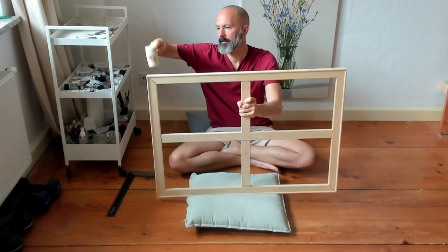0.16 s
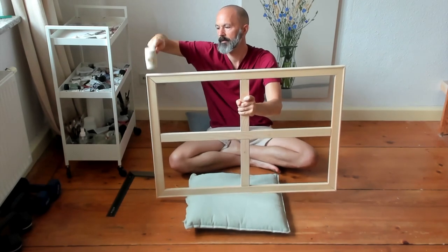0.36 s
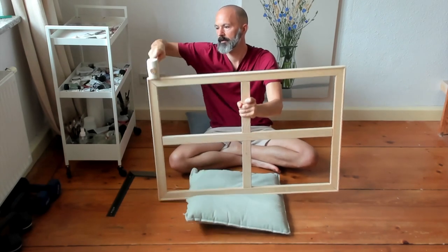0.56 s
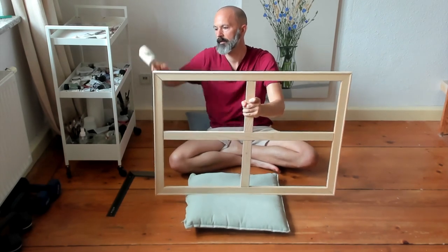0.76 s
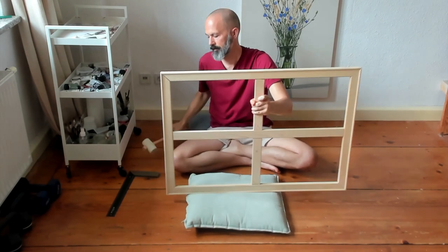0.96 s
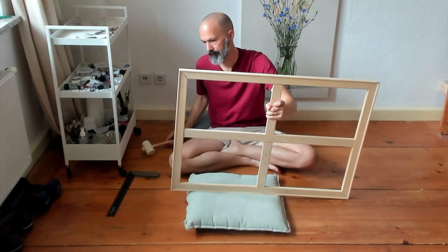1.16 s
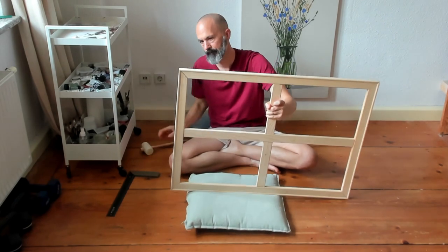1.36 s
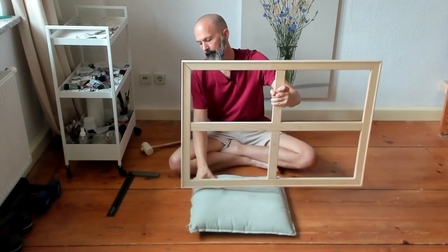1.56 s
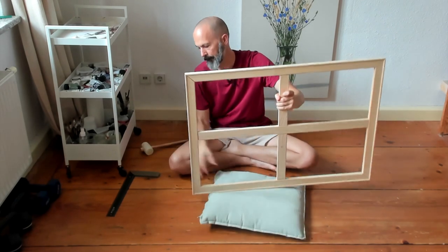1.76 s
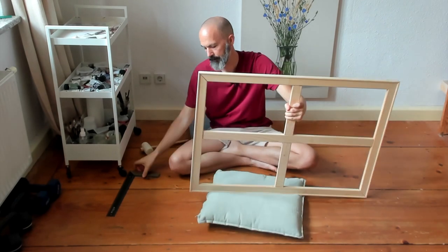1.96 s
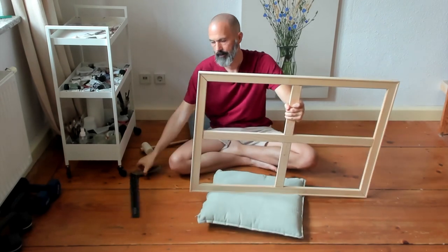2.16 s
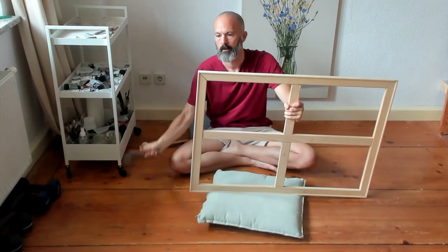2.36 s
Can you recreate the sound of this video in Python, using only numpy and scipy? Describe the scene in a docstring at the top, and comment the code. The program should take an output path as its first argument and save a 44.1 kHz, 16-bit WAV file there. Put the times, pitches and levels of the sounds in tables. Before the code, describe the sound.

Mallet knocks on a hand-held wooden frame: three bright, hollow, short taps at about 0.1, 0.3 and 0.55 s. Cloth rustles near 0.9 s. The mallet clatters onto floorboards at 1.1-1.3 s. Soft rustling and low shifting follow, the frame bumps the floor at 1.9 s, then a steel square scrapes the boards at 2.0-2.3 s and rings faintly. Small room, short reverberation, very quiet background.

```python
"""Mallet and wooden frame

A mallet taps the corner of a hand-held wooden stretcher frame three times in a small room with floorboards.
The mallet is laid on the boards, head then clattering handle, and the frame bumps the floor: decaying modes.
A steel square dragged over the boards is hiss, rub and grit-fed modes, and rings as it lifts.
Clothes, shifting weight and the steady background are shaped noise; the room is a wall echo and a short tail."""
import sys
import numpy as np
from scipy import signal
from scipy.io import wavfile
from scipy.ndimage import uniform_filter1d

SR = 44100
rng = np.random.default_rng(int(sys.argv[2]) if len(sys.argv) > 2 else 0)


def file_out(sig):
    """Save sig as 16-bit WAV at sys.argv[1]."""
    # one column per channel
    cols = np.atleast_2d(sig).T
    # limit, then scale
    lim = np.clip(cols, -1, 1)
    pcm = np.round(lim * 32767).astype(np.int16)
    wavfile.write(sys.argv[1], SR, pcm)


N = 110250
TIME_S = np.arange(N) / SR
RING_TIME_S = TIME_S[:SR * 3 // 4]
BAND_EDGES_HZ = np.geomspace(23, 16800, 20)  # half octaves
BAND_CENTRES_HZ = np.sqrt(BAND_EDGES_HZ[1:] * BAND_EDGES_HZ[:-1])


def amp(db):
    """Decibels to gain."""
    return 10 ** (np.asarray(db) / 20)


def unit(x):
    """Scale to rms 1."""
    return x / np.sqrt(np.mean(x ** 2) + 1e-20)


def at_hz(table, hz):
    """Every column after the first, interpolated on a log-frequency axis."""
    f_hz, *columns = np.transpose(table)
    return [np.interp(np.log(hz), np.log(f_hz), column) for column in columns]


def level(curve):
    """Gain along a (t/s, level/dB) curve, fading quickly outside it."""
    t_s, db = np.transpose(curve)
    outside_s = np.abs(TIME_S - np.clip(TIME_S, t_s.min(), t_s.max()))
    return amp(np.interp(TIME_S, t_s, db)) * np.exp(-outside_s / 0.0063)


def fade(t60_s):
    """Exponential decay, 60 dB per t60."""
    return np.exp(-np.log(1000) * RING_TIME_S / t60_s)


def band(x, low_hz, high_hz):
    """Butterworth band-pass."""
    sos = signal.butter(2, [low_hz, min(high_hz, .45 * SR)], "band", fs=SR, output="sos")
    return signal.sosfilt(sos, x)


def low_cut(x):
    """High-pass: the knocks and the scrape carry little deep bass."""
    return signal.sosfilt(signal.butter(2, 246, "high", fs=SR, output="sos"), x)


def noise_bands(size):
    """Unrelated half-octave noises of rms 1."""
    bands = []
    for low_hz, high_hz in zip(BAND_EDGES_HZ, BAND_EDGES_HZ[1:]):
        white = rng.standard_normal(size + 4000)  # the lead-in lets the filter settle
        bands.append(unit(band(white, low_hz, high_hz)[-size:]))
    return np.array(bands)


def noise(spectrum):
    """Steady noise with the given half-octave levels."""
    return amp(at_hz(spectrum, BAND_CENTRES_HZ)[0]) @ noise_bands(N)


def ring(hz, t60_s):
    """One struck mode: a decaying cosine of height 1."""
    return np.cos(2 * np.pi * hz * RING_TIME_S) * fade(t60_s)


def through(x, response):
    """Convolve a signal with an impulse response."""
    return signal.fftconvolve(x, response)[:N]


def add(out, t_s, sound):
    """Mix a sound in at a time."""
    part = out[int(t_s * SR):][:len(sound)]
    part += sound[:len(part)]


def tick(edges_hz, t60_s):
    """A hard contact: a few milliseconds of bright noise."""
    return unit(band(rng.standard_normal(len(RING_TIME_S)), *edges_hz)) * fade(t60_s)


def knocks(blows, modes, grain):
    """Each blow rings the wood's main modes and the crowd between them, and shakes the floor.

    Contact hardness sets the colour and the rise time."""
    # deep floor modes: f/Hz, level/dB, t60/s
    boom_modes = [(122.3, -2, .5), (128.6, -8.5, .3), (155.6, 0.5, 0.29), (223.1, -7.5, 0.22)]
    boom_rise_s, bass_knee_hz = 0.0049, 544
    # rise constant at 0 dB/octave; doubles per softness_db of lost brightness
    contact_rise_s, softness_db = .00012, 2.5
    crack_hz, crack_t60_s = (10800, 17200), 0.01

    out = np.zeros(N)
    grain_db, grain_t60_s = at_hz(grain, BAND_CENTRES_HZ)
    grain_fade = fade(grain_t60_s[:, None])
    boom = sum(amp(db) * ring(hz, t60_s) for hz, db, t60_s in boom_modes)
    boom = boom * (1 - np.exp(-RING_TIME_S / boom_rise_s))  # swells slowly
    for t_s, db, bass_db, bright_db, crack_db, boom_db in blows:
        def colour_db(hz):
            bass = bass_db / (1 + (hz / bass_knee_hz) ** 4)
            return db + bass + bright_db * np.log2(np.maximum(hz / 1000, 1))

        rise_s = contact_rise_s * 2 ** (-bright_db / softness_db)
        rise = (1 - np.exp(-RING_TIME_S / rise_s)) ** 2
        body = -sum(amp(mode_db + colour_db(hz)) * ring(hz, t60_s) for hz, mode_db, t60_s in modes)
        crowd_gain = amp(grain_db + colour_db(BAND_CENTRES_HZ))
        crowd = crowd_gain @ (noise_bands(len(RING_TIME_S)) * grain_fade)
        wood = low_cut(rise * (body + crowd))
        crack = amp(crack_db) * tick(crack_hz, crack_t60_s)
        add(out, t_s, wood + crack + amp(boom_db) * boom)
    return out


def mallet_taps():
    """Three blows ring the modes of the hand-held frame."""
    # blows: t/s, level/dB, extra bass/dB, brightness above 1 kHz/(dB/octave), crack/dB, floor boom/dB
    taps = [(.0806, 3, -5, -2.5, -17, -46.5), (.3158, 0, -6, -3, -7.5, -37.5),
            (.5637, 2.5, -7, -2.5, -17.5, -52)]
    # wood modes: f/Hz, level/dB, t60/s
    frame_modes = [(245, -29, .13), (308, -21, .07), (338, -19, .09), (405, -10, .065), (438, -14, .095),
                   (530, -25, .04), (640, -25, .045), (860, -20, .045), (968, -20, .045), (1090, -17, .035),
                   (1230, -21, .045), (1320, -26, .04), (1895, -27, .04), (2730, -22, .018),
                   (3330, -21, .018), (385, -52, .7)]
    # crowded short modes: f/Hz, level per half octave/dB, t60/s
    frame_grain = [(60, -50.5, 0.063), (203, -40.5, 0.034), (601, -22.5, 0.052), (1530, -23, .022),
                   (3500, -15.5, .018), (6560, -14.5, 0.015), (9500, -14, 0.0056), (16000, -25, 0.0069)]
    return knocks(taps, frame_modes, frame_grain)


def mallet_laid_down():
    """Head and handle knock on the boards' modes; the handle rattles to rest in short noise ticks."""
    # blows: t/s, level/dB, extra bass/dB, brightness above 1 kHz/(dB/octave), crack/dB, floor boom/dB
    mallet_down = [(1.1278, -15, 7, -4.5, -69, -40.5), (1.1565, -14, 11.5, -5.5, -61, -42),
                   (1.1622, -13, 6.5, -4, -55, -44), (1.2414, -3, 3, -2.5, -54, -62),
                   (1.2506, -12, -7, 2.5, -51, -64), (1.2566, 4.5, -10, -3, -42, -35.5),
                   (1.2732, -15, 2, -0.5, -49, -76)]
    # board modes: f/Hz, level/dB, t60/s
    board_modes = [(170, -30.5, 0.33), (245, -36.5, 0.037), (294.4, -12, 0.078), (330, -31, 0.14),
                   (425, -20, 0.14), (559, -20, 0.076), (618.4, -31, 0.21), (742, -24.5, .08),
                   (991, -17, 0.035), (1060, -21, 0.032), (1179, -40, 0.24), (2030, -29, .07)]
    # crowded short modes: f/Hz, level per half octave/dB, t60/s
    board_grain = [(60, -47, .08), (200, -24.5, 0.18), (700, -24, 0.055), (1850, -31, 0.048),
                   (5000, -34.5, 0.12), (10000, -37.5, 0.099), (16000, -43, 0.13)]
    # last light rattles of the handle: t/s, level/dB
    rattles = [(1.3024, -30), (1.3138, -30)]
    rattle_hz, rattle_t60_s = (1600, 6500), 0.018

    out = knocks(mallet_down, board_modes, board_grain)
    for t_s, db in rattles:
        add(out, t_s, amp(db) * tick(rattle_hz, rattle_t60_s))
    return out


def frame_bump():
    """The frame bumps the floor and rings its own set of modes."""
    # blow: t/s, level/dB, extra bass/dB, brightness above 1 kHz/(dB/octave), crack/dB, floor boom/dB
    bump = [(1.9013, 0.92, -2.8, -1.5, -41.5, -42)]
    # wood modes: f/Hz, level/dB, t60/s
    bump_modes = [(254, -23.5, 0.19), (317, -27, 0.23), (359, -32.5, 0.096), (501, -13, 0.054),
                  (548, -17, 0.11), (633, -26.5, 0.067), (712, -19.5, 0.017), (1100, -27, .05),
                  (1207, -25.5, 0.11)]
    # crowded short modes: f/Hz, level per half octave/dB, t60/s
    bump_grain = [(60, -50, 0.1), (194, -33.5, 0.12), (688, -21, 0.042), (1460, -26.5, 0.016),
                  (2920, -31.5, 0.019), (6800, -28, 0.004), (16000, -48, 0.0066)]
    return knocks(bump, bump_modes, bump_grain)


def grit():
    """Sparse random catches of uneven size and either sign."""
    catches_per_s, size_db = 5000, 3
    hits = rng.random(N) < catches_per_s / SR
    sizes = amp(size_db * np.minimum(rng.exponential(1, N), 4))
    return hits * sizes * rng.choice([-1, 1], N)


def steel_square():
    """Grit catches the sliding blade and rings it; the boards rasp below; the blade rings free as it lifts."""
    # blade modes: f/Hz, level scraped/dB, level lifted/dB
    steel_modes = [(958, -10, -30), (1214, -14, -24), (2083, -18, -15), (2202, -10, -24), (2584, -20, -14),
                   (2950, -18, -10), (3402, -17, -14), (3854, -17, 0), (4210, -11, -30), (4624, -11, -20),
                   (4899, -15, -11), (5421, -9, -24), (5975, 0, -18), (6029, 0, -18), (6455, -5, -24),
                   (7208, 0, -14), (7564, -9, -30), (8457, -10, -30), (8742, -9, -30), (9168, -12, -30),
                   (9884, -6, -24), (10330, -19, -30), (11090, -18, -30), (11639, -14, -30),
                   (12915, -9, -30), (13500, -14, -30), (13954, -11, -18), (14600, -14, -30),
                   (14971, -10, -30), (15400, -13, -30)]
    # friction of the steel: t/s, level/dB
    drag_curve = [(1.96, -80), (1.998, -56), (2.04, -69), (2.146, -35), (2.18, -39), (2.202, -28),
                  (2.25, -34.5), (2.266, -50), (2.284, -41), (2.36, -77)]
    # boards under it: t/s, level/dB
    rub_curve = [(1.97, -63), (1.98, -57), (2.018, -40), (2.042, -55.5), (2.142, -36), (2.158, -51),
                 (2.196, -44), (2.218, -24.5), (2.232, -40), (2.242, -31.5), (2.34, -76)]
    # spectra of steel hiss and board rub: f/Hz, level per half octave/dB
    hiss_spectrum = [(1500, -43), (3000, 4.5), (5000, 12), (7000, 9), (9000, 10), (11000, 2), (15000, -17)]
    rub_spectrum = [(60, -17), (200, -27), (330, 0.5), (550, -7), (750, -2), (1100, 2), (2200, -3),
                    (3500, -16.5), (8000, -28)]
    hiss_db, rub_db = -11, -2.5
    clear_db, clear_t60_s = -11.5, 0.15  # before damping
    skirt_db, skirt_t60_s = -13.5, 0.018  # broad ring while the blade is pressed to the boards
    lift_s, lift_db, lift_t60_s, lift_rise_t60_s = 2.287, -47.5, .7, 0.0079  # t60 before damping
    damping_hz = 13300

    rough = unit(np.sqrt(np.abs(uniform_filter1d(grit() ** 2, size=60))))
    drag = level(drag_curve)
    hiss = amp(hiss_db) * drag * unit(noise(hiss_spectrum))
    rub = amp(rub_db) * level(rub_curve) * unit(noise(rub_spectrum))
    out = low_cut(rough * (hiss + rub))
    drag_rms = np.sqrt(np.mean(drag ** 2))
    for hz, scraped_db, free_db in steel_modes:
        damping = 1 + (hz / damping_hz) ** 2
        catches = grit() * rough * drag
        skirt = ring(hz, skirt_t60_s)
        clear = amp(clear_db) * unit(through(catches, ring(hz, clear_t60_s / damping)))
        pressed = amp(skirt_db) * unit(through(through(catches, skirt), skirt))
        out += drag_rms * amp(scraped_db) * (clear + pressed)
        free = ring(hz, lift_t60_s / damping) * (1 - fade(lift_rise_t60_s))
        add(out, lift_s, amp(lift_db + free_db) * free)
    return out


def clothes():
    """Cloth swishes with each move of the arm: noise under straight-sided envelopes."""
    # moves: start/s, attack/s, hold/s, release/s, level/dB
    rustles = [(0.859, 0.085, 0.063, 0.083, -52), (1.521, 0.0038, 0.063, 0.2, -56.5),
               (1.673, 0.045, 0.031, 0.023, -60), (1.767, 0.04, 0.0077, 0.074, -56),
               (1.33, 0.13, 0.93, 0.12, -66.5), (2.42, 0.092, 0.0081, .05, -55)]
    # spectrum: f/Hz, level per half octave/dB
    cloth = [(60, -56), (300, -11), (550, -3.5), (900, 5.5), (1800, 3), (3500, 4), (7000, -4),
             (11000, -3.5), (16000, 1)]
    moves = np.zeros(N)
    for start_s, attack_s, hold_s, release_s, db in rustles:
        corners_s = start_s + np.cumsum([0, attack_s, hold_s, release_s])
        moves += amp(db) * np.interp(TIME_S, corners_s, [0, 1, 1, 0])
    return moves * unit(noise(cloth))


def shifting_weight():
    """Low rumble of the body shifting on the boards: noise along a level curve."""
    # t/s, level/dB
    shifting = [(0, -65), (.8, -72.5), (1.1, -67), (1.45, -56.5), (1.7, -62), (1.85, -62), (2.2, -62),
                (2.38, -61), (2.5, -63)]
    # spectrum: f/Hz, level per half octave/dB
    rumble = [(30, -12.5), (55, -16), (80, -1), (125, 4), (200, -7.5), (400, -5.5), (1500, -42.5)]
    return level(shifting) * unit(noise(rumble))


def room(x):
    """One wall echo and a short diffuse tail of decaying noise bands."""
    # f/Hz, reverberation/dB, t60/s
    reverb = [(60, -13.5, .3), (200, -12, 0.13), (420, -7.5, .2), (890, -7, .19), (2086, -1.5, 0.15),
              (4070, -7.5, .2), (8000, -13, 0.15), (15000, -12, 0.16)]
    gap_s, build_s, echo_s, echo_db = 0.0011, 0.009, 0.011, -17
    db, t60_s = at_hz(reverb, BAND_CENTRES_HZ)
    # tail energy per band independent of t60, in proportion to bandwidth
    bandwidth_share = np.diff(BAND_EDGES_HZ) / (SR / 2)
    gains = amp(db) * np.sqrt(bandwidth_share * 2 * np.log(1000) / (t60_s * SR))
    tail = gains @ (noise_bands(len(RING_TIME_S)) * fade(t60_s[:, None]))
    tail = tail * np.clip((RING_TIME_S - gap_s) / build_s, 0, 1)
    add(tail, echo_s, amp([echo_db]))
    return through(x, tail)


def background():
    """Steady noise floor."""
    # f/Hz, level per half octave/dB
    air = [(30, -86), (100, -92), (300, -83.5), (1000, -79.5), (3000, -84.5), (8000, -81), (16000, -80)]
    return noise(air)


def scene():
    """Knocks and steel with room; clothes, weight and background without; mono."""
    direct = mallet_taps() + mallet_laid_down() + frame_bump() + steel_square()
    return (direct + room(direct) + clothes() + shifting_weight() + background())[None]


def record(dry, top=.62):
    """Round the loudest peaks by tanh, then cut the top steeply."""
    rounded = top * np.tanh(dry / top)
    return signal.sosfilt(signal.cheby2(14, 70, 17300, fs=SR, output="sos"), rounded)


dry = scene()
out = record(dry)
file_out(out)
```